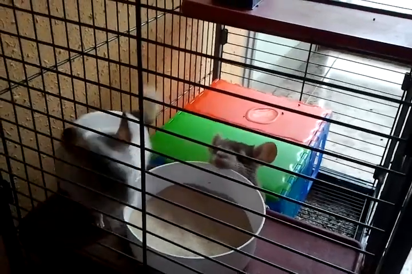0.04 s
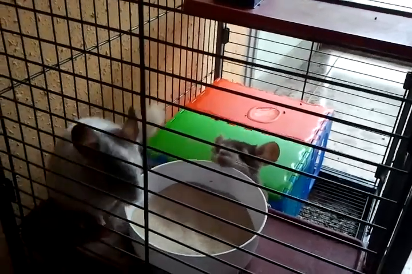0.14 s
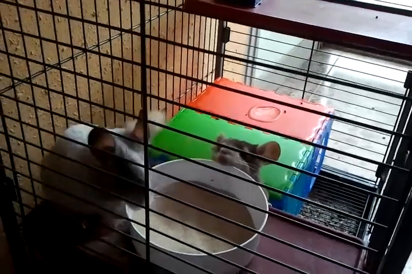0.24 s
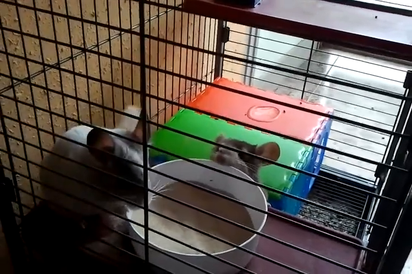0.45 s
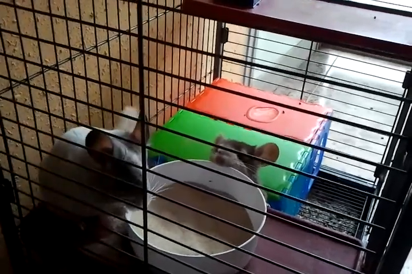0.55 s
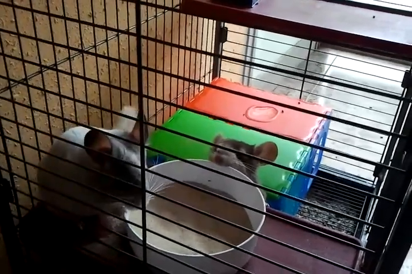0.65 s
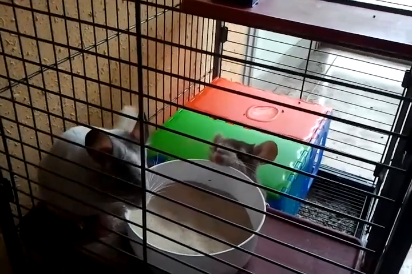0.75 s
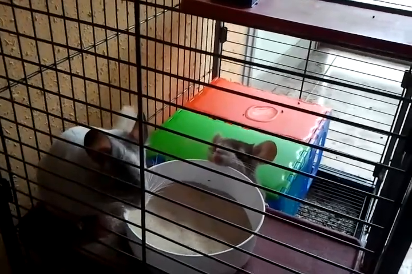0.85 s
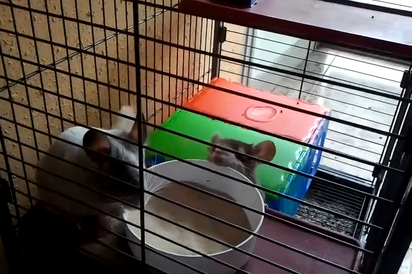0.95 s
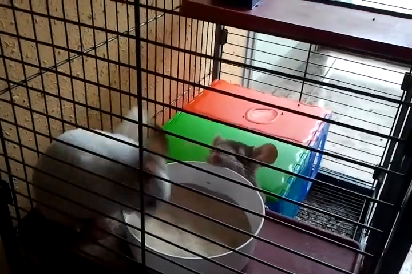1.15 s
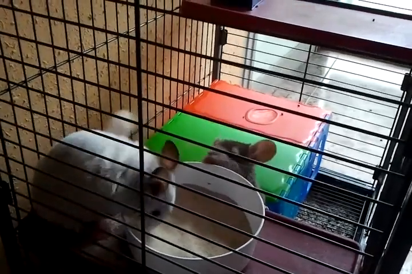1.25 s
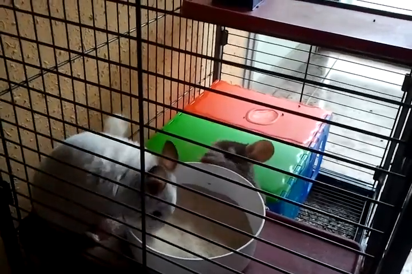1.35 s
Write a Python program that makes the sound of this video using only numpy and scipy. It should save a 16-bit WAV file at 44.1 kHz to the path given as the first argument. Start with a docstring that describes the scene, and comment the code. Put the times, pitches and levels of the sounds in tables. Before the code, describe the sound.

A chinchilla shifts its feet in a wire cage: sand crunches, claws tick on plastic and a few quick footfalls lightly rattle the cage. A faint scuff follows near the end. Close microphone, quiet room.

```python
"""A faint crunch, then a paw scuffing over spilt sand, close by, above the low rumble of a quiet room.
A chinchilla shifts its feet beside a bowl of bath sand in a wire cage. Grains grind under its paws,
claws tick on hard plastic, and two firm footfalls and a few soft ones ring the tray and rattle the cage.
Near the end it leans into the bowl with a faint second scuff. One microphone, near the cage."""
import sys
import numpy as np
from scipy import signal
from scipy.fft import rfft, irfft
from scipy.io import wavfile

SR = 44100
rng = np.random.default_rng(int(sys.argv[2]) if len(sys.argv) > 2 else 0)


def store_wav(level_fs):
    """Save 16-bit WAV to argv[1]."""
    pcm = np.round(np.clip(np.atleast_2d(level_fs), -1, 1) * 32767)
    wavfile.write(sys.argv[1], SR, pcm.T.astype(np.int16))


N = 61739


def amp(db):
    """Decibels to gain."""
    return 10 ** (np.asarray(db) / 20)


def unit_rms(x):
    """Scales to an rms of 1."""
    return x / np.sqrt(np.mean(x ** 2) + 1e-20)


def curve_at(points, hz):
    """Reads a table on a log-frequency axis."""
    f, value = np.transpose(points)
    return np.interp(np.log(hz + 1), np.log(f + 1), value)


def add(mix, start_s, sound):
    """Mixes a sound in at its start time."""
    part = mix[max(round(start_s * SR), 0):][:len(sound)]
    part += sound[:len(part)]


def convolve(x, response):
    """Filters x and keeps the length of the scene."""
    return signal.fftconvolve(x, response)[:N]


def click(spectrum, size=4096):
    """One tiny impact: the minimum-phase pulse with the given spectrum."""
    hz = abs(np.fft.fftfreq(size, 1 / SR))
    log_gain = np.log(amp(curve_at(spectrum, hz)))
    response = np.exp(np.conj(signal.hilbert(log_gain)))
    return np.fft.ifft(response).real[:size // 2]


def grains(per_s, spectrum, pitch=1, spread_db=4):
    """A steady stream of tiny impacts of uneven size, rms 1."""
    sizes = amp(spread_db * np.minimum(rng.exponential(1, N), 3.5))
    impacts = sizes * rng.choice([-1, 1], N) * (rng.random(N) < per_s / SR)
    grain = click([(hz * pitch, db) for hz, db in spectrum])
    return unit_rms(convolve(impacts, grain))


def pressure(start, rise, hold, release):
    """Pressure of a paw: a ramp, a hold, then a fall of 20 dB per release time."""
    t = np.arange(N) / SR - start
    ramp = np.clip(t / rise, 0, 1) ** 1.25
    return ramp * amp(-20 * np.maximum(t - rise - hold, 0) / release)


# The quiet room, all around the microphone: f/Hz, spectral level/dB
ROOM_TONE = [(20, -9), (35, -0.5), (60, 3), (85, 0), (120, -1.5), (185, -6), (240, -3), (300, -9),
             (400, -9.5), (800, -14), (1700, -18), (2600, -20.5), (4800, -22), (6200, -20.5), (7400, -21),
             (8600, -33), (10000, -49)]
def room_tone(level_db=-52.5):
    """Steady low rumble and soft hiss."""
    colour = amp(curve_at(ROOM_TONE, np.fft.rfftfreq(N, 1 / SR)))
    noise = irfft(rfft(rng.standard_normal(N)) * colour, N)
    return amp(level_db) * unit_rms(noise)


# Decay of the room beyond the cage: f/Hz, t60/s
ROOM_DECAY = [(100, .6), (250, 0.76), (600, 0.66), (2000, .4), (8000, 0.38)]
def room_reverb(x, onset_s=0.015):
    """The walls return a diffuse tail in which each band dies at its own speed."""
    hz, t, noise = signal.stft(rng.standard_normal(SR), SR, nperseg=256)
    decay = amp(-60 * t / curve_at(ROOM_DECAY, hz)[:, None])
    _, tail = signal.istft(noise * decay, SR, nperseg=256)
    tail *= np.clip(np.arange(len(tail)) / SR / onset_s, 0, 1)
    return convolve(x, tail / np.linalg.norm(tail))


# Sand grains, heard close: f/Hz, spectral level/dB
SAND_SPECTRUM = [(100, -30.5), (800, -19), (2000, -15.5), (2800, -11.5), (3900, -4.5), (4800, -0.5),
                 (6000, 0), (7200, -5), (8500, -14.5)]
# The tray under a sliding paw: f/Hz, spectral level/dB
RUB_SPECTRUM = [(50, -22), (100, -8.5), (150, -2), (260, -0.5), (400, -2.5), (700, -8), (1300, -9.5),
                (2000, -10.5), (3000, -18), (6000, -38.5)]
# Slides beside and in the bowl: t/s, rise/s, hold/s, release/s, level/dB, pitch/ratio, rub/dB re grains
PAW_SCUFFS = [(.197, .046, 0.041, 0.1, -42.5, 0.98, -3), (1.338, 0.033, .004, 0.2, -51, 0.84, -4)]
# Sand crushed underfoot: t/s, hold/s, level/dB, pitch/ratio, rub/dB re grains
PAW_CRUNCHES = [(.004, 0.0042, -55, 0.98, -8.5), (.172, 0.0025, -50, 1.08, -8.5),
                (0.2218, 0.0042, -45.5, 1.04, 3), (0.313, 0.0025, -42, 1.02, -8.5),
                (0.3452, 0.0022, -42, 1.11, -18), (0.381, 0.0071, -39, 1.01, -5.5),
                (0.421, .004, -48.5, 0.93, -9)]
def sand(crunch_rise_s=0.0013, crunch_release_s=0.0075):
    """Grains grind under sliding and landing paws and rub against the tray."""
    crunches = [(start, crunch_rise_s, hold, crunch_release_s, db, pitch, rub_db)
                for start, hold, db, pitch, rub_db in PAW_CRUNCHES]
    out = np.zeros(N)
    rub = grains(per_s=1500, spectrum=RUB_SPECTRUM)
    for start, rise, hold, release, db, pitch, rub_db in PAW_SCUFFS + crunches:
        grit = grains(per_s=4000, spectrum=SAND_SPECTRUM, pitch=pitch)
        out += amp(db) * pressure(start, rise, hold, release) * (grit + amp(rub_db) * rub)
    return out


# One claw tick, heard close: f/Hz, spectral level/dB
TICK_SPECTRUM = [(100, -26), (1200, -15), (2800, -17.5), (4000, -8.5), (5000, -1.5), (6000, 0),
                 (7300, -2.5), (8500, -14.5)]
# Echoes off the bowl and tray, right by the paw: delay/s, level/dB re tick
NEAR_ECHOES = [(.00095, -7), (.00135, -10.5), (.0025, -19.5)]
# Ticks on the cage floor: t/s, direct peak level/dB
CLAW_TICKS = [(0.2415, -26.5), (.2450, -10.5), (.2650, -26), (0.2998, -27), (.3870, -21.5), (.4788, -25.5)]
def claws(scatter_t60_s=0.053, scatter_db=-7.5):
    """Claws and single grains strike hard plastic; each tick echoes and scatters among the wires."""
    out, t = np.zeros(N), np.arange(4096) / SR
    tick = click(TICK_SPECTRUM)
    tick /= abs(tick).max()
    for start, db in CLAW_TICKS:
        scatter = rng.standard_normal(len(t)) * amp(-60 * t / scatter_t60_s)
        scatter /= np.linalg.norm(scatter)
        add(out, start, amp(db) * tick)
        add(out, start, amp(db + scatter_db) * signal.fftconvolve(tick, scatter))
        for delay, echo_db in NEAR_ECHOES:
            add(out, start + delay * rng.uniform(0.9, 1.1), amp(db + echo_db) * tick)
    return out


# Modes of the plastic tray and cage: f/Hz, level/dB, t60/s
TRAY_MODES = [(178, -19, 0.068), (203.5, -26, .35), (236, 3.5, 0.051), (226.73, -25.5, 0.91),
              (244.4, -24.5, 1), (302.6, -7, 0.053), (309, -21, .4), (344, -13.5, 0.1), (416, -15.5, .045),
              (551.5, -9, 0.1), (598.6, -12.5, 0.087), (860, -13.5, 0.044), (1027, -27, 0.14),
              (1248, -17, .09)]
# Dense rattle of the cage around the animal: f/Hz, spectral level/dB
RATTLE_SPECTRUM = [(120, -26.5), (300, -0.5), (580, 2.5), (780, -7.5), (1000, -3.5), (1280, -3.5),
                   (1650, -23), (3000, -24), (6000, -44)]
# Paws landing near the microphone: t/s, level/dB, contact/s, pitch under load/ratio, rattle level/dB
FOOTFALLS = [(.240, -29, 0.0092, .65, -53), (0.3456, -23.5, 0.0055, .88, -42.5),
             (.382, -24.5, 0.00074, 1.0, -44), (.3987, -31, 0.0031, 1.3, -59.5),
             (0.4295, -27.5, 0.0067, .99, -54.5)]
def footfalls(load_relax_s=0.0595, main_mode_hz=236, radiate_hz=126):
    """Each footfall rings the tray and shakes the cage; a longer contact weakens the higher modes."""
    ring, shake, t = np.zeros(N), np.zeros(N), np.arange(SR) / SR
    for start, db, contact, pitch, rattle_db in FOOTFALLS:
        bend = 1 + (pitch - 1) * np.exp(-(t / load_relax_s) ** 2)  # the load briefly detunes the tray
        bent_t = np.cumsum(bend) / SR
        for hz, mode_db, t60 in TRAY_MODES:
            softness = (1 + (main_mode_hz * contact) ** 2) / (1 + (hz * contact) ** 2)
            envelope = amp(db + mode_db - 60 * t / t60) * (1 - np.exp(-t / contact))
            add(ring, start, softness * envelope * np.sin(2 * np.pi * hz * bent_t))
        shake += amp(rattle_db) * pressure(start, rise=0.0016, hold=contact, release=0.051)
    high_pass = signal.butter(3, radiate_hz, "high", fs=SR, output="sos")  # the tray radiates little bass
    rattle = shake * grains(per_s=2500, spectrum=RATTLE_SPECTRUM)
    return signal.sosfilt(high_pass, ring) + rattle


def scene():
    """Beside the cage, in mono: direct sand, claws and footfalls, with the room well behind them."""
    bright = sand() + claws()
    thumps = footfalls()
    reverb = room_reverb(amp(-11) * bright + amp(-14.5) * thumps)
    return (bright + thumps + reverb + room_tone())[None]


def record(dry, edge_hz=8500):
    """The microphone chain cuts off the top of the treble."""
    low_pass = signal.firwin(141, edge_hz, window=("kaiser", 7), fs=SR)
    return signal.oaconvolve(dry, low_pass[None], "same")


dry = scene()
out = record(dry)
store_wav(out)
```